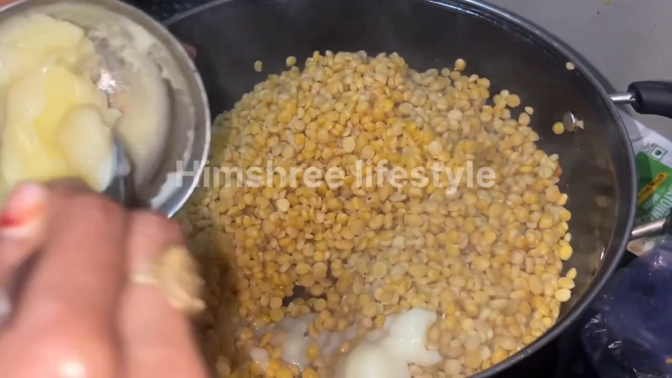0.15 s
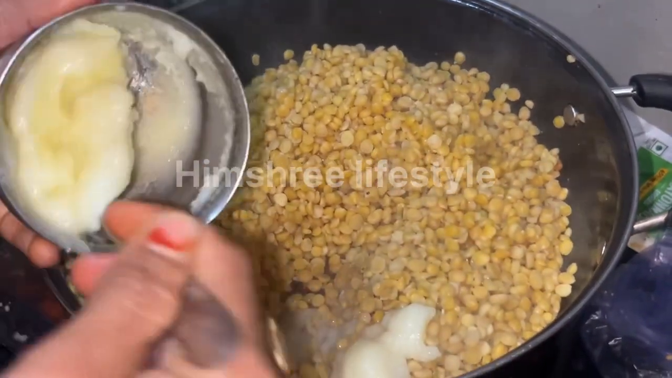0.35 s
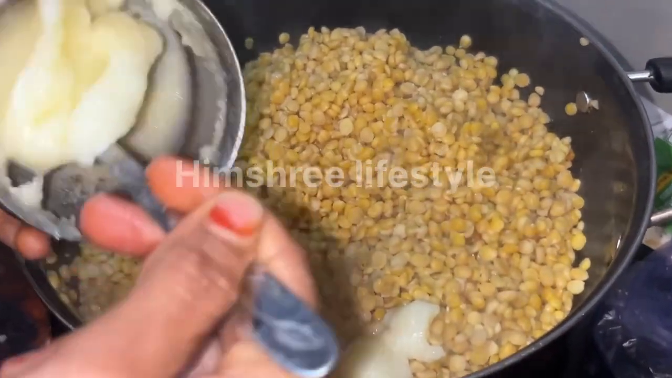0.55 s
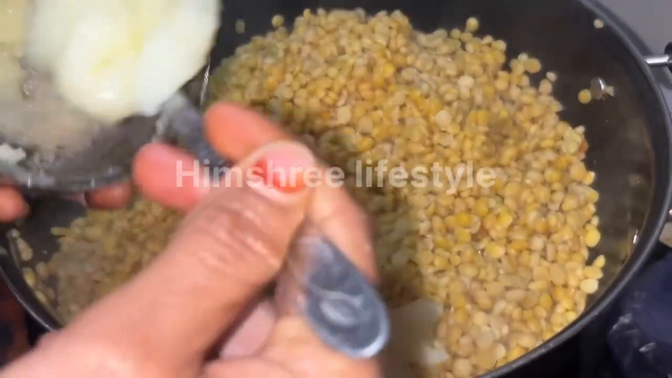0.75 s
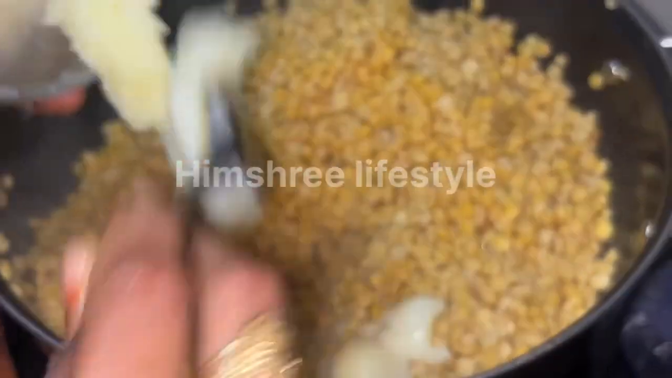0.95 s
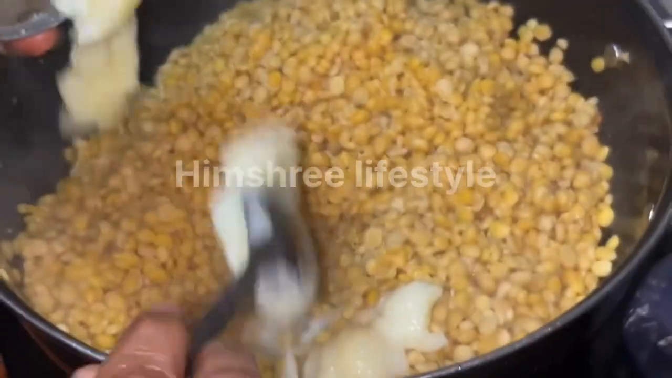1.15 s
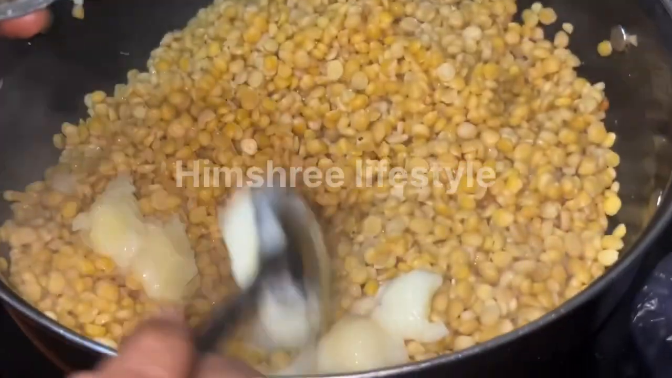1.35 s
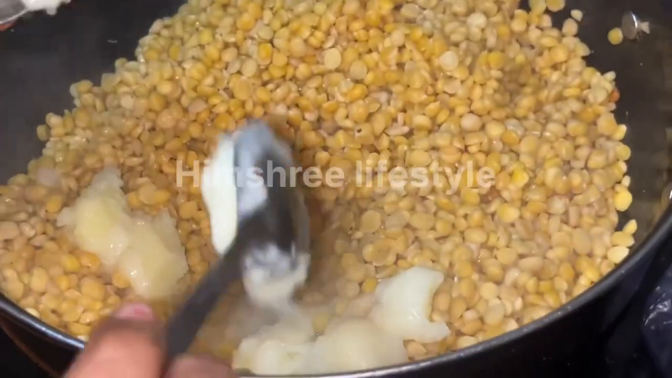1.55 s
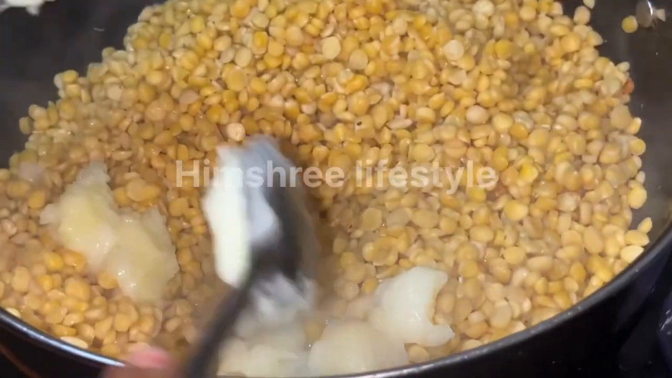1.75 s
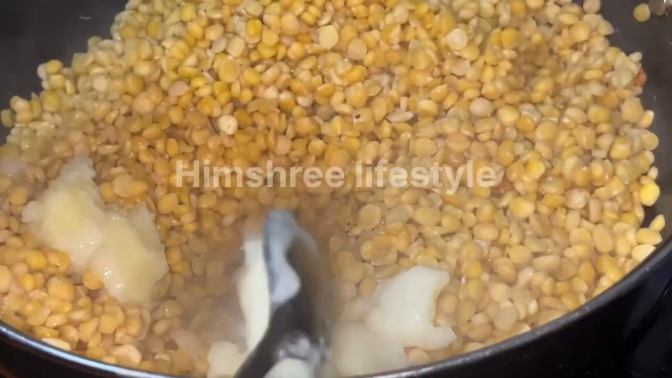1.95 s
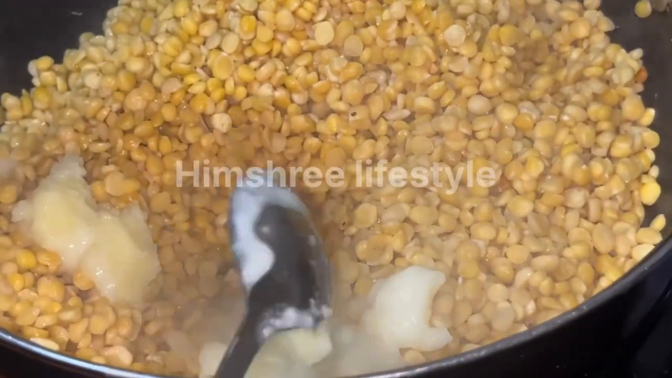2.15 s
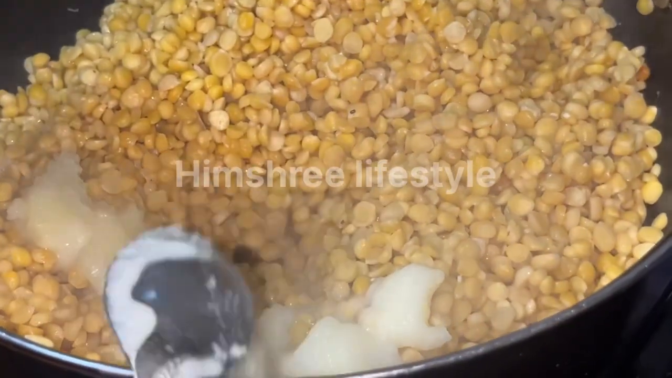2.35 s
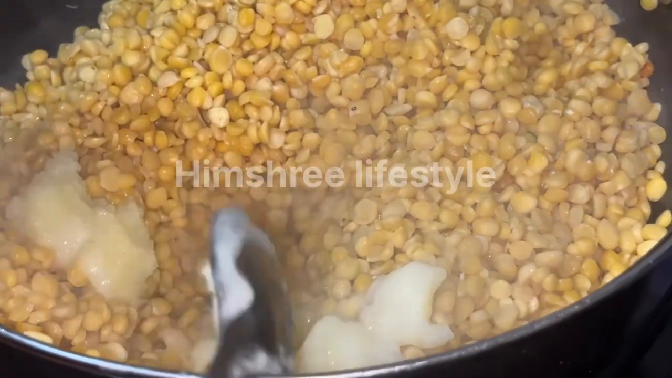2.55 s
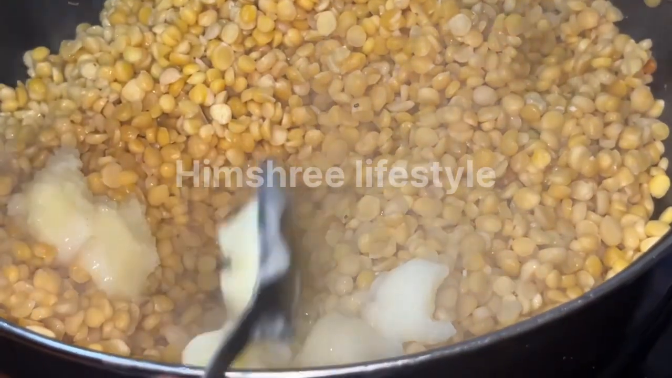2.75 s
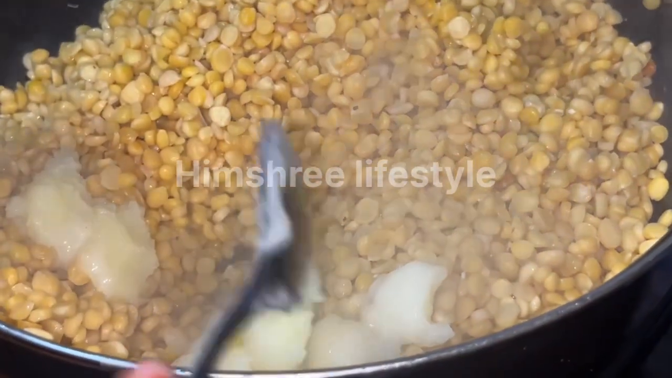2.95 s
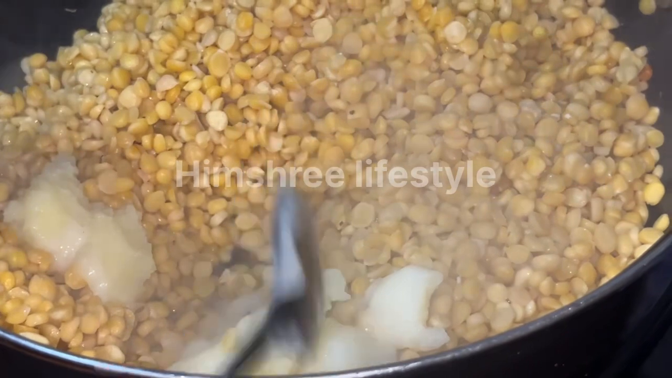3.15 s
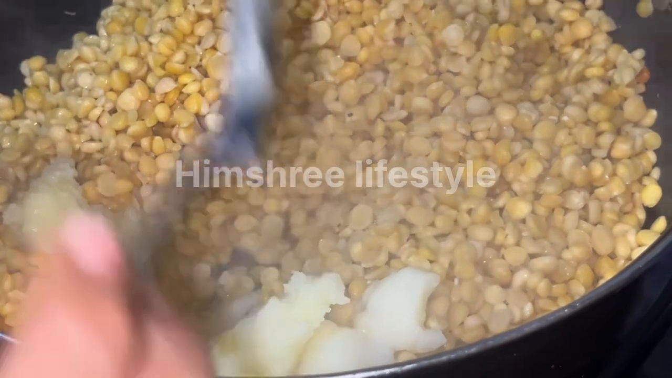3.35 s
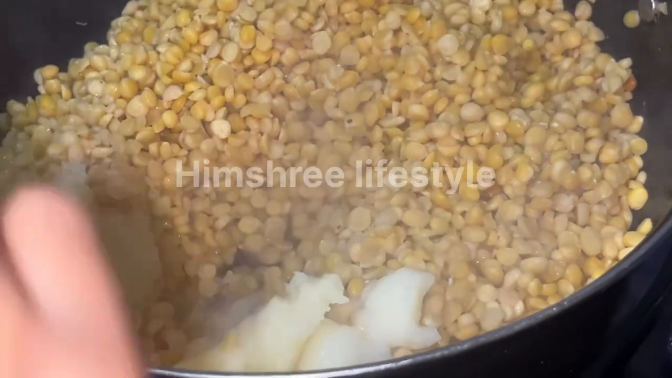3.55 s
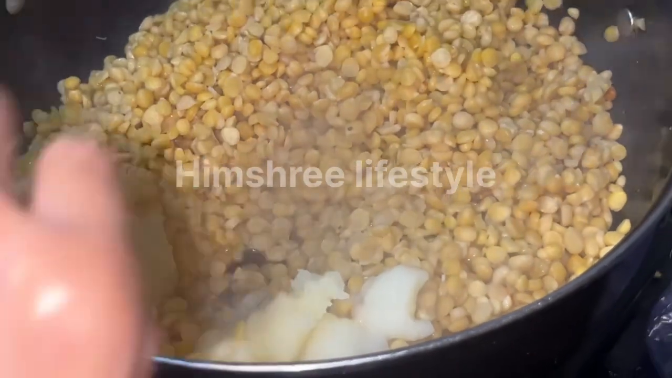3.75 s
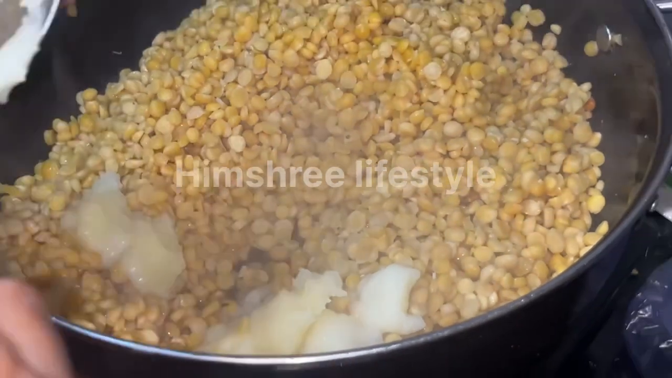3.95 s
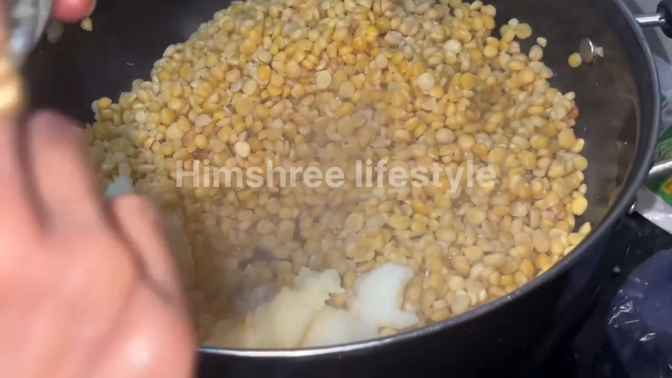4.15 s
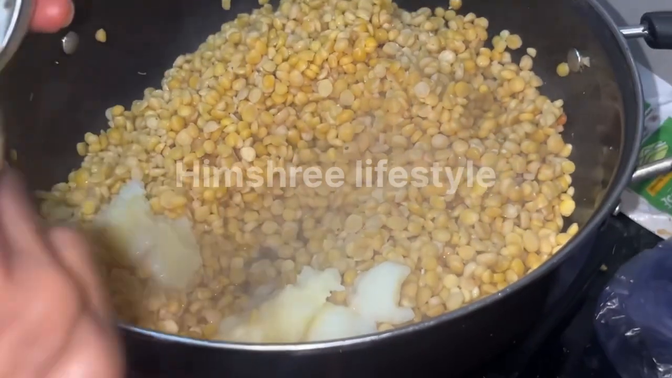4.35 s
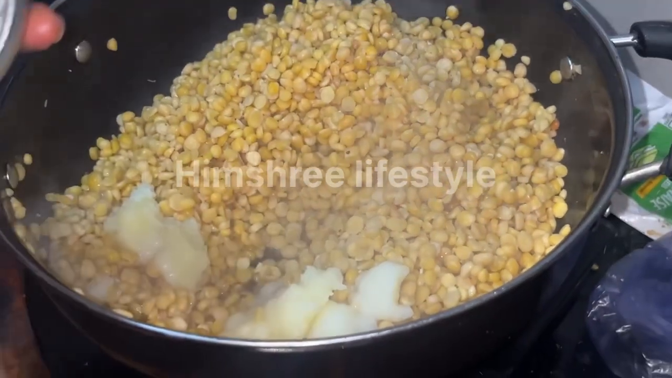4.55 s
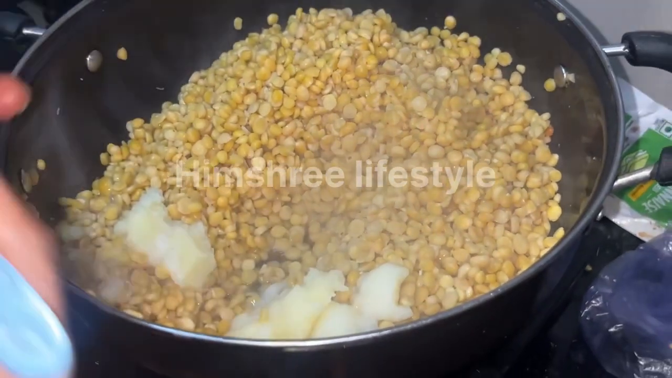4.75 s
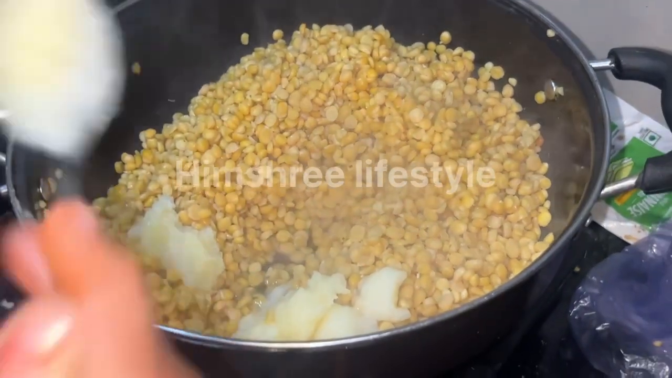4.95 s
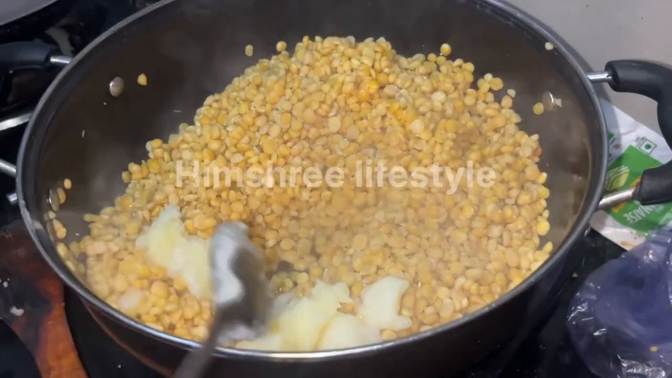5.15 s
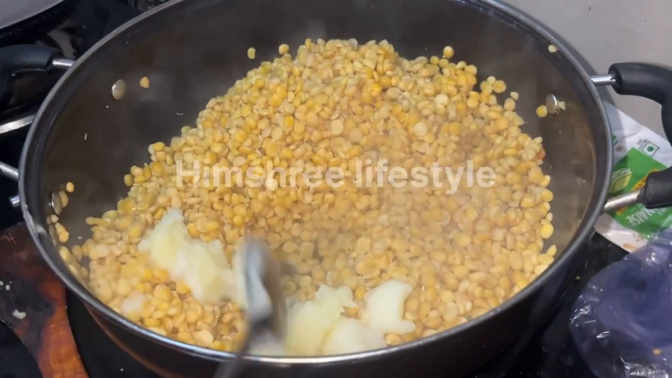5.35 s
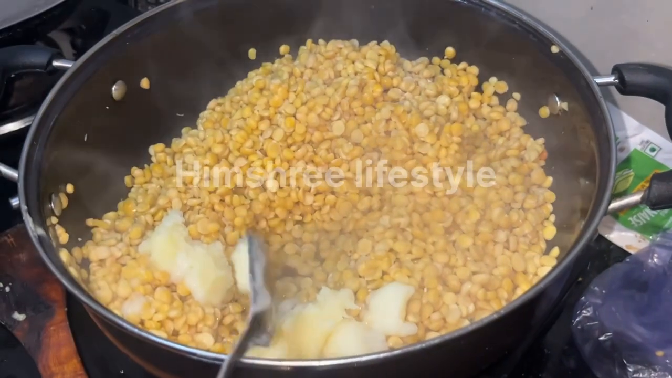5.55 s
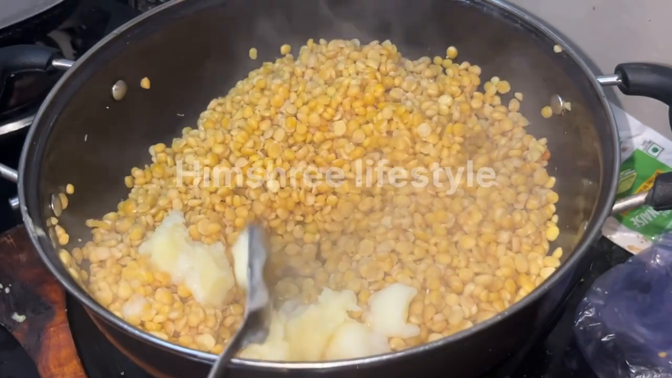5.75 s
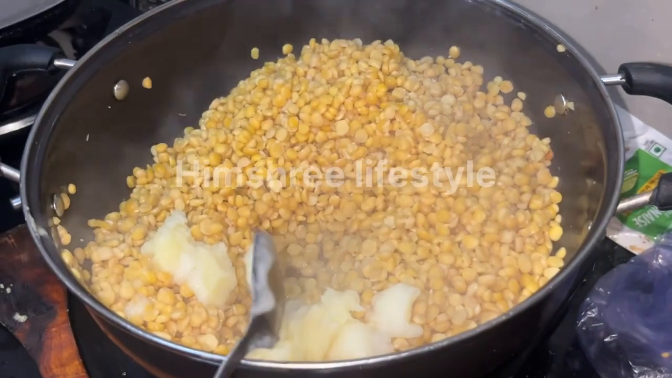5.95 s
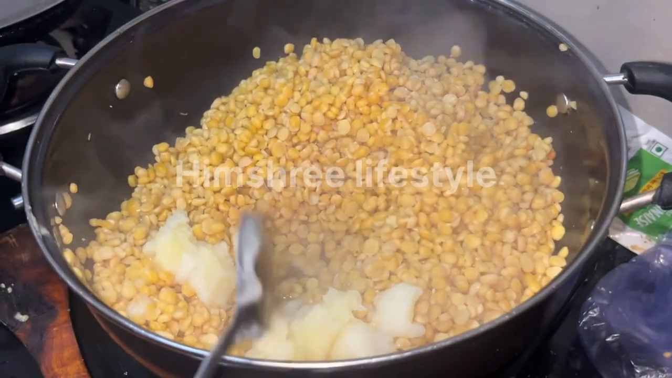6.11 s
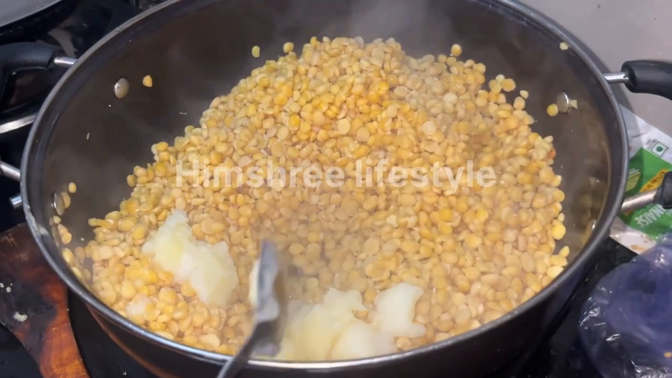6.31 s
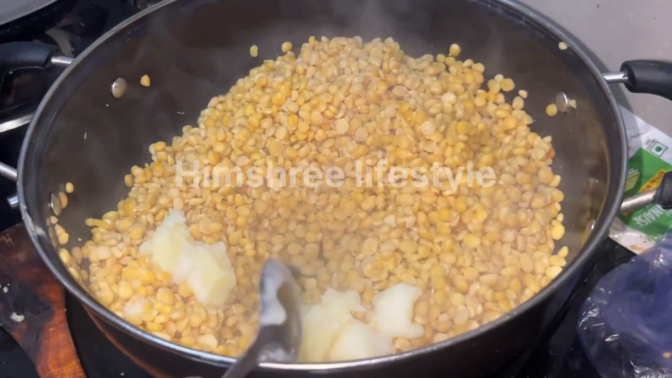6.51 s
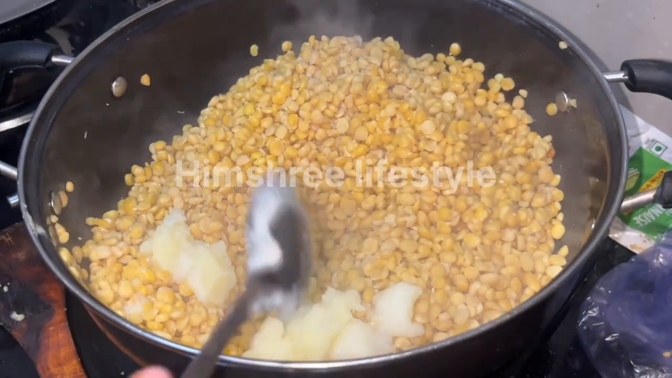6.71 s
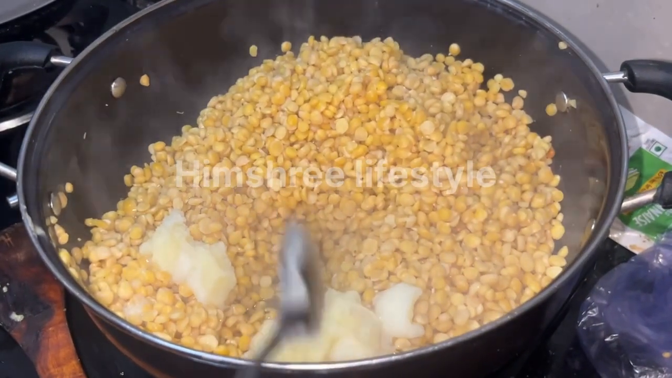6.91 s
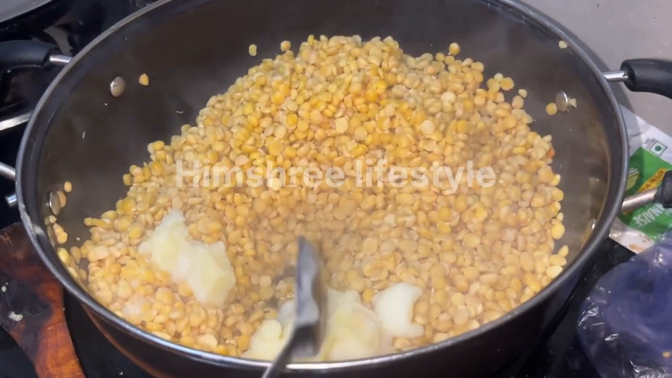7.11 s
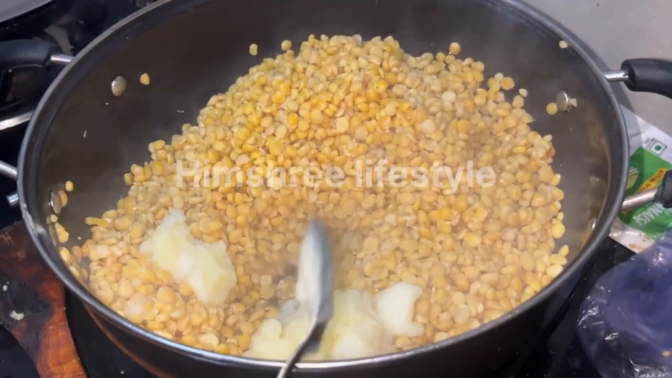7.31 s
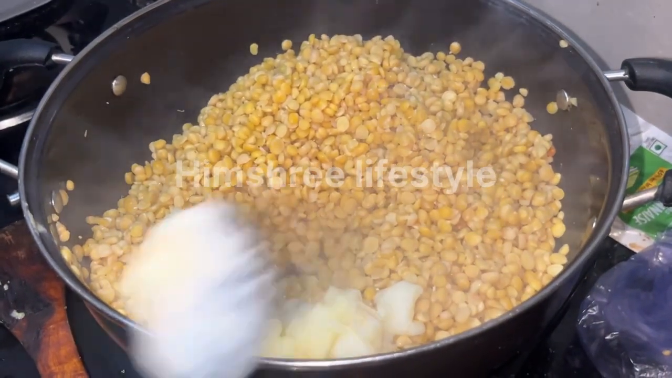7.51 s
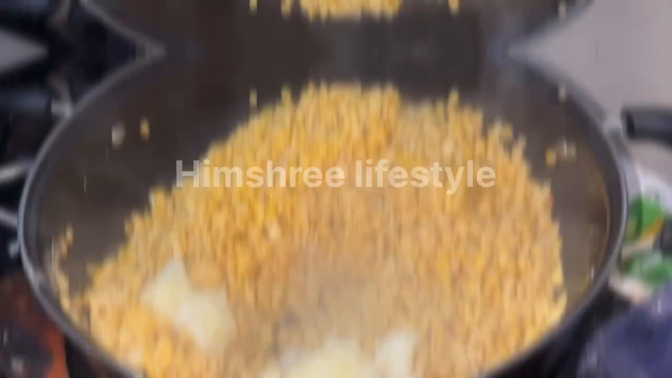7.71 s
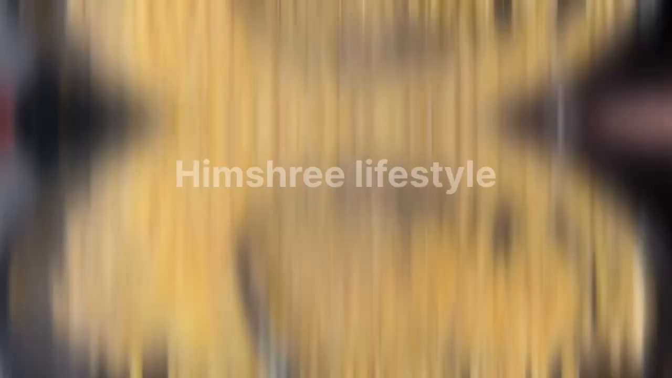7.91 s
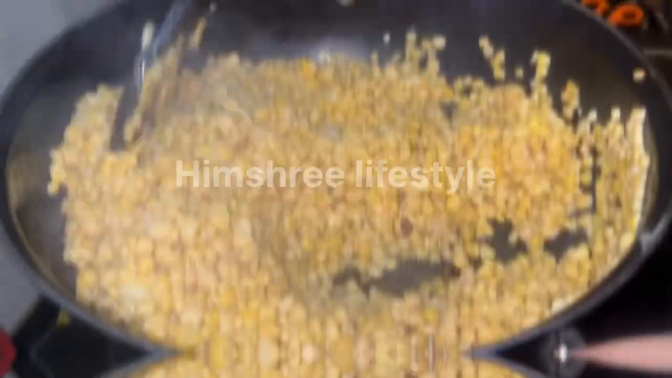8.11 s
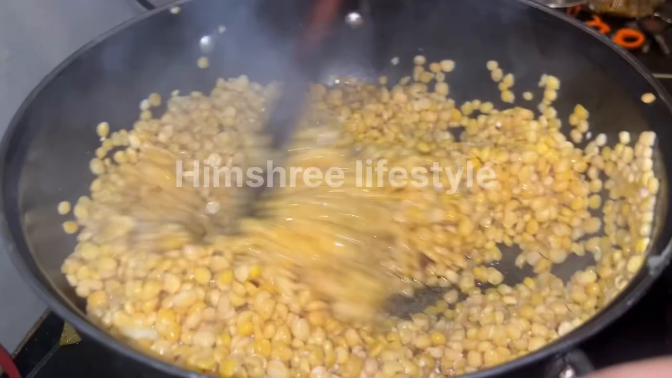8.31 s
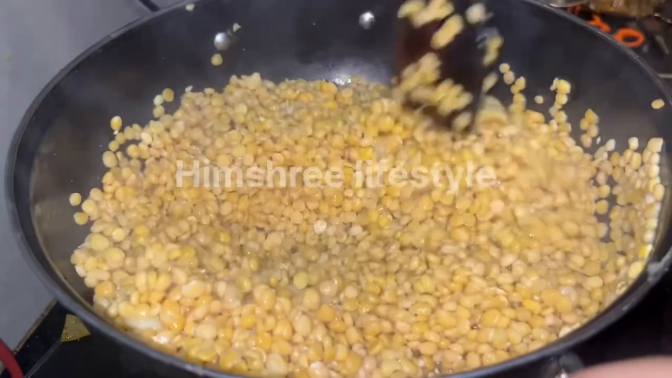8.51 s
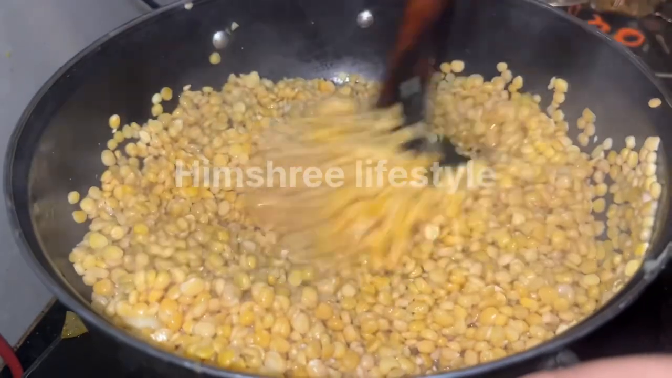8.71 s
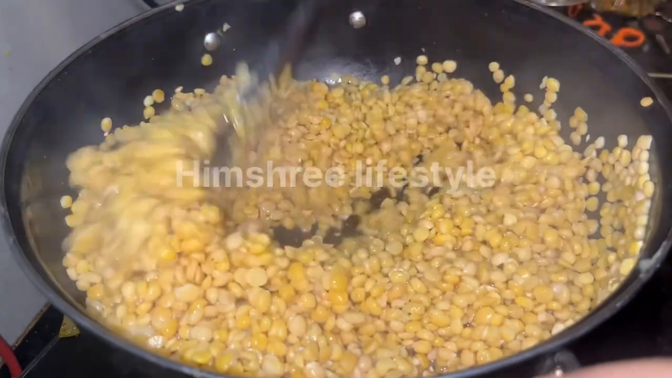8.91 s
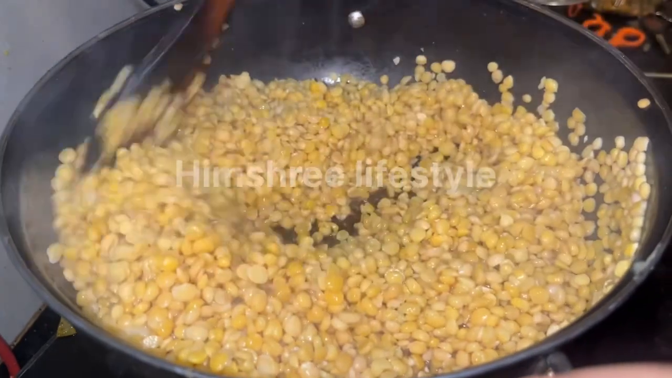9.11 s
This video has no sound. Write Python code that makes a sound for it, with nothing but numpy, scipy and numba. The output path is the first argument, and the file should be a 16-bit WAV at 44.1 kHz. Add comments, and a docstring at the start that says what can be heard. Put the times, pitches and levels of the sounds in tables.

```python
"""A steel spoon is knocked on the wall of a hot pan of lentils to shake off ghee: decaying modes and noise
bursts. A steady sizzle lies behind it, random steam pops over coloured noise. After a short silence the scene
changes: a wooden spatula thuds as damped modes and drags as stick-slip grains through resonances. Two close
microphone ports hear it all with a phase difference; rising steam rumbles on them as low noise."""
import sys
import numpy as np
from scipy import signal
from scipy.fft import rfft, irfft, next_fast_len
from scipy.io import wavfile
from numba import njit

SR = 44100
rng = np.random.default_rng(int(sys.argv[2]) if len(sys.argv) > 2 else 0)


def boost_factor(decibels):
    """Convert a level in decibels to a linear amplitude factor."""
    exponent = np.asarray(decibels, float) / 20
    return 10 ** exponent


def output_pcm(signal):
    """Save a mono or channel-first signal as 16-bit PCM at the path in sys.argv[1].

    Samples are clipped to [-1, 1] before scaling.
    """
    pcm = np.clip(np.atleast_2d(signal).T, -1, 1) * 32767
    wavfile.write(sys.argv[1], SR, np.round(pcm).astype(np.int16))


N = 408842

# spoon blows on the pan wall: t/s, level/dB, then lift/dB of the modes near 750, 1350 and 2100 Hz
SPOON_BLOWS = [(1.817, -8, -14.5, -11, -8.5), (1.9665, -6.5, -16.5, -18, -7),
               (2.1065, -9, -10.5, -13, -8.5), (2.5048, -4, -13.5, 4.5, -11),
               (2.6787, -6, -14.5, -13, -7.5), (3.012, -7.5, -14.5, -20, -5),
               (3.1784, -5.5, -16.5, -15, -4), (3.654, -19.5, -24, -2, -16), (5.082, -9.5, 4, 8.5, -9.5),
               (5.2003, -8, 0, 4, -5.5), (5.3829, -17, 1, 11.5, -11.5), (5.5416, -9.5, -12, -18, -3.5),
               (5.7058, -9, -12.5, -29, -2.5), (5.8682, -11, -12.5, -15, -5), (6.1676, -5, -8.5, -19, -2),
               (6.763, -4, -8.5, -2, -5.5), (6.9225, -4.5, -9.5, -8, -3.5), (7.0736, -5.5, -6.5, -4, -2.5),
               (7.2159, -12.5, -5, 5.5, -3), (7.862, -4, -35, 3.5, -39)]
# spatula strokes: t/s, hold/s, judder level/dB, pan floor resonance f/Hz, grit level/dB
DRAG_STROKES = [(8.122, .01, -46, 300, -58), (8.232, 0.13, -49.5, 300, -43.5),
                (8.679, .06, -29, 285, -33.5), (9.244, .01, -39.5, 360, -42)]
# the silence between spoon and spatula: start t/s, end t/s
SILENCE_SPAN = (7.869, 7.919)


def rms_one(x):
    """Normalisation: divide by the root mean square so that the mean power is one."""
    return x / np.sqrt(np.mean(x ** 2) + 1e-20)


def in_time(rows, silent=None):
    """Linear interpolation turns columns into signals; a given silent level holds outside the first one."""
    s, *columns = np.transpose(rows)
    t = np.arange(N) / SR
    signals = []
    for k, column in enumerate(columns):
        outside = silent if k == 0 else None
        signals.append(np.interp(t, s, column, left=outside, right=outside))
    return signals


def at_hz(points, hz):
    """Interpolation on a log-frequency axis, which spaces equal pitch ratios equally."""
    table_hz, values = np.transpose(points)
    return np.interp(np.log(hz + 1), np.log(table_hz), values)


def colour(x, spectrum):
    """Linear filtering: multiply the Fourier spectrum by a gain curve, then set the rms to one."""
    size = next_fast_len(N)
    hz = np.arange(size // 2 + 1) * SR / size
    shaped = rfft(x, size) * boost_factor(at_hz(spectrum, hz))
    return rms_one(irfft(shaped, size)[..., :N])


def band(x, low_hz, high_hz):
    """Band-pass filtering with a maximally flat Butterworth response."""
    sos = signal.butter(2, [low_hz, min(high_hz, .45 * SR)], "band", fs=SR, output="sos")
    return signal.sosfilt(sos, x)


def drift(rate):
    """Slow random modulation: unit-variance Gaussian points, rate per second, joined by lines."""
    steps = rng.standard_normal(int(N / SR * 400))[:int(N / SR * rate) + 2]
    return np.interp(np.arange(N) * rate / SR, np.arange(len(steps)), steps)


def grains(per_s, spread_db):
    """Bernoulli impulse process whose exponential dB sizes make a few clicks much larger than the rest."""
    sizes_db = spread_db * np.minimum(rng.exponential(1, N), 4.5)
    clicks = boost_factor(sizes_db) * rng.choice([-1, 1], N)
    return clicks * (rng.random(N) < per_s / SR)


def ring(clicks, hz, t60):
    """Damped harmonic oscillator: a two-pole filter that decays by 60 dB in t60 seconds."""
    r, w = boost_factor(-60 / (t60 * SR)), 2 * np.pi * hz / SR
    return signal.lfilter([0, np.sin(w)], [1, -2 * r * np.cos(w), r * r], clicks + 1e-18)


@njit
def moving_resonance(x, hz, r, sr):
    """Time-varying resonance: the pole angle follows the centre frequency, the radius sets the damping."""
    y = np.zeros(len(x))
    for i in range(2, len(x)):
        drive = (1 - r * r) * (x[i] - x[i - 2])
        feedback = 2 * r * np.cos(2 * np.pi * hz[i] / sr) * y[i - 1] - r * r * y[i - 2]
        y[i] = drive + feedback
    return y


def strike(times, levels_db, modes, contact_s, scatter_db):
    """Modal superposition: each blow swells over the contact and scatters mode strength, phase and pitch."""
    hz, level_db, t60 = np.transpose(modes)[:, :, None]
    t, out = np.arange(int(.2 * SR)) / SR, np.zeros(N + SR)
    onset = 1 - np.exp(-(t / contact_s) ** 2)
    chance = rng.standard_normal((len(times), 3, len(modes), 1))
    for s, blow_db, (size, phase, detune) in zip(times, levels_db, chance):
        decay = boost_factor(blow_db[:, None] + level_db + scatter_db * size - 60 * t / t60)
        rings = decay * np.sin(2 * np.pi * hz * (1 + 0.015 * detune) * t + 1.09 * phase)
        start = int((s - contact_s) * SR)
        out[start:start + len(t)] += rings.sum(axis=0) * onset
    return out[:N]


def burst(s, level_db, low_hz, high_hz, t60):
    """Broadband impact: a band of decaying noise for a contact too brief to ring."""
    t, out = np.arange(int(.1 * SR)) / SR, np.zeros(N + SR)
    envelope = boost_factor(-60 * t / t60) * np.minimum(t / (0.019 * t60), 1)
    puff = band(rng.standard_normal(len(t)) * envelope, low_hz, high_hz)
    start = int(s * SR)
    out[start:start + len(t)] = boost_factor(level_db) * puff / np.max(np.abs(puff))
    return out[:N]


def swells(times, holds, levels_db, rise, fall):
    """Exponential envelopes, straight in dB (rise and fall in dB/s): the largest gain and its event."""
    t = np.arange(0, N + 32, 32) / SR
    s, hold, db = (np.reshape(v, (-1, 1)) for v in (times, holds, levels_db))
    shapes = db - rise * np.maximum(s - t, 0) - fall * np.maximum(t - s - hold, 0)
    gain = np.interp(np.arange(N) / SR, t, boost_factor(shapes.max(axis=0)))
    loudest = np.repeat(shapes.argmax(axis=0), 32)[:N]
    return gain, loudest


def kitchen(x):
    """Diffuse reverberation: convolution with two independent noise tails that die band by band."""
    # reverberation of the kitchen: f/Hz, t60/s
    tail_t60 = [(300, 0.36), (1400, 0.3), (4000, 0.18), (10000, 0.051)]
    t, edges = np.arange(int(.5 * SR)) / SR, np.geomspace(150, 16000, 9)
    tails = 0
    for lo, hi in zip(edges, edges[1:]):
        decay = boost_factor(-60 * t / at_hz(tail_t60, np.sqrt(lo * hi)))
        tails = tails + band(rng.standard_normal((2, len(t))), lo, hi) * decay
    return signal.fftconvolve(x[None], tails * (t > .003), axes=1)[:, :N]


def ports(shared, apart, lead, alike):
    """Interaural-style coherence: shared sound has a phase gap, unshared sound adds with opposite signs."""
    # the two ports: f/Hz, left-right level/dB, right lead/rad, likeness 0-1,
    # then lead/rad and likeness 0-1 once the spatula is in
    port_table = [(0, 0, 0, .99, 0, .97), (400, -2, .3, .93, .2, .85), (700, -5.5, -.3, .65, -.8, .7),
                  (1200, -1.5, -.3, .6, -1.5, .4), (1550, -4, 0, .15, -1, .15), (2100, -1, 0, .98, 0, .85),
                  (3000, 0, 0, .995, -1.6, .62), (4200, 0, 0, .995, -.8, .42), (4900, 0, 0, .995, .8, .05),
                  (5600, 0, .8, .78, 1.6, .5), (6500, 0, 1, .75, 1.1, .58), (7600, 0, 2.6, .78, 2.9, .8),
                  (8000, 0, 3.05, .99, 3.14, .995), (8750, 0, 3.2, .995, 3.2, .995),
                  (9300, 0, 3.75, .8, 3.75, .7), (10600, 0, 5.3, .73, 5.3, .73),
                  (11150, 0, 6.25, .995, 6.25, .995), (12900, 0, 6.35, .995, 6.3, .995),
                  (13700, 0, 7.4, .5, 6.9, .4), (14500, 0, 9.35, .99, 9.35, .99),
                  (16500, 0, 9.42, .995, 9.42, .995)]
    size, table = next_fast_len(N), np.array(port_table)
    hz = np.arange(size // 2 + 1) * SR / size
    balance_db, gap, like = (np.interp(hz, table[:, 0], table[:, k]) for k in (1, lead, alike))
    like, side = np.clip(like, 0, 1), np.array([[1], [-1]])
    common = np.sqrt((1 + like) / 2) * rfft(shared, size)
    opposed = side * np.sqrt((1 - like) / 2) * rfft(apart, size)
    turned = (common + opposed) * boost_factor(side * balance_db / 2) * np.exp(-.5j * side * gap)
    return irfft(turned, size)[:, :N]


def low_noise():
    """Turbulent pressure noise: burner flutter, and lumpy rumble from steam or a shaken stove."""
    # one gust of steam over the ports: t/s, level/dB
    steam = [(5.6, -46), (5.67, -52), (5.78, -51), (5.85, -32), (5.95, -36.5), (6.17, -33.5), (6.28, -29),
             (6.4, -38.5), (6.73, -49)]
    # rumble spectrum per Hz: f/Hz, level/dB
    rumble_spectrum = [(15, -45), (25, -24), (54, -3), (108, -3.5), (140, 3.5), (173, -4), (233, -7.5),
                       (420, -22.5), (550, -17.5), (920, -27), (1500, -25), (2600, -120)]
    # burner flutter spectrum per Hz: f/Hz, level/dB
    flame_spectrum = [(15, -37), (25, -46), (38, -3), (54, -3.5), (70, -2), (128, 2), (152, -12), (172, -3),
                      (183, -17), (260, -22), (340, -11.5), (570, -120)]
    # burner flutter in time: t/s, level/dB
    flame_course = [(0.0, -53), (0.89, -59.5), (1.36, -53), (3.2, -52), (3.98, -56.5), (4.68, -52),
                    (4.9, -60), (5.6, -56), (7.0, -43), (7.82, -59.5), (8.15, -48), (9.27, -51)]
    knocks, strokes = np.transpose(SPOON_BLOWS), np.transpose(DRAG_STROKES)
    # knocks shake the stove 18 ms late
    knock_shake, _ = swells(knocks[0] + 0.018, 0, knocks[1] - 34, rise=740, fall=167)
    stroke_shake, _ = swells(strokes[0], strokes[1], strokes[2] - 7.5, rise=160, fall=167)
    gust = boost_factor(in_time(steam, -120)[0])
    rumble_gain = (gust + knock_shake + stroke_shake) * boost_factor(2.9 * drift(25))
    flame_gain = boost_factor(in_time(flame_course)[0] + 1.8 * drift(7))
    flame = flame_gain * colour(rng.standard_normal((2, N)), flame_spectrum)
    return flame + rumble_gain * colour(rng.standard_normal((2, N)), rumble_spectrum)


def pan_colour(x):
    """Resonant coloration: parallel band-passes of the pan add to the sizzle here and there."""
    # f/Hz, width/Hz, relative level/dB
    fry_peaks = [(1846, 47, 14), (2813, 34, 11), (3493, 70, 9), (4700, 100, -6), (5200, 53, 13.5),
                 (6000, 160, -20)]
    lifts = (boost_factor(db - 11.5) * band(x, hz - width / 2, hz + width / 2) for hz, width, db in fry_peaks)
    return x + sum(lifts)


def sizzle():
    """Shot noise: tiny steam pops, by pitch region, over blurred hiss; the second row is unrelated noise."""
    # vigour of the frying: t/s, level/dB, treble lift/dB
    vigour = [(0.0, -42.5, 5), (0.31, -43.5, 3), (0.9, -40.5, 2), (1.26, -38.5, 2.5), (2.5, -37, -1),
              (2.86, -38, 0.5), (3.12, -39, 1), (4.5, -38.5, 2.5), (4.96, -38.5, 1.5), (5.21, -37.5, 2.5),
              (6.17, -38.5, -0.5), (6.4, -37.5, 1.5), (7.75, -38, -1), (7.93, -32, 3.5), (8.08, -33, -1.5),
              (8.78, -32, 1), (9.01, -31.5, 4), (9.27, -32, 1.5)]
    # frying spectrum per Hz: f/Hz, level/dB
    fry_spectrum = [(150, -37), (300, -17.5), (600, -8), (1100, -12), (1500, -4), (2000, -4), (3300, 0),
                    (4500, -1.5), (5500, 0), (7500, 2), (10000, 0), (12500, -4), (14500, -7),
                    (15700, -15.5)]
    body_db, lift_db = in_time(vigour)
    edges = np.geomspace(1300, 17000, 7)
    pops = 0
    for lo, hi in zip(edges, edges[1:]):
        region = band(grains(700, 6.0) * boost_factor(0.5 * drift(38)), lo, 1.62 * hi)
        pops = pops + rms_one(region) * np.sqrt(hi)
    snaps = rms_one(grains(400, 3.8))
    direct = rng.standard_normal(N) + 0.58 * rms_one(pops) + 0.27 * snaps
    both = pan_colour(colour(np.array([direct, rng.standard_normal(N)]), fry_spectrum))
    both = both * boost_factor(.6 * drift(5))
    treble = signal.sosfilt(signal.butter(2, 8000, "high", fs=SR, output="sos"), both)
    return boost_factor(body_db) * (both + (boost_factor(lift_db) - 1) * treble)


def groans():
    """Frequency modulation: wavering near-tones from the phase integral of a drifting frequency."""
    # the pan floor hums under the blade: t/s, hold/s, level/dB, f/Hz
    hums = [(7.948, 0.039, -49.5, 326), (8.417, 0.107, -50.5, 368)]
    s, hold, level_db, tone_hz = np.transpose(hums)
    gain, groan = swells(s, hold, level_db, rise=800, fall=700)
    wavering = boost_factor(2.1 * drift(30))
    hz = tone_hz[groan] * (1 + 0.0187 * drift(34))
    return gain * wavering * np.sin(2 * np.pi * np.cumsum(hz) / SR)


def rubs():
    """Stick-slip friction: grains pass twice through the resonance of the spoon bowl against the wall."""
    # spoon rubbing the wall: t/s, hold/s, level/dB, bowl resonance f/Hz
    wall_rubs = [(0.003, 0.13, -62.5, 460), (1.44, 0.166, -59.5, 523), (2.278, 0.038, -45.5, 1320),
                 (2.37, 0.033, -43, 1330), (4.487, 0.016, -47, 1090), (5.218, 0.0027, -26, 1150),
                 (5.262, 0.0037, -31.5, 680), (5.396, .02, -53, 1050), (6.558, .04, -38, 1410),
                 (6.628, .025, -37, 696), (6.895, .022, -32, 1130)]
    slips = grains(1200, 3) * boost_factor(2.5 * drift(45))
    r = np.exp(-np.pi * 280 / SR)  # 280 Hz bandwidth per pass
    s, hold, level_db, bowl_hz = np.transpose(wall_rubs)
    gain, rub = swells(s, hold, level_db, rise=600, fall=650)
    hz = bowl_hz[rub]
    once = moving_resonance(slips, hz, r, SR)
    return gain * rms_one(moving_resonance(once, hz, r, SR))


def spatula():
    """Damped impact and stick-slip: dull wooden thuds, then judder rings the pan floor as lentils grate."""
    # spatula on the pan floor: t/s, level/dB
    floor_thuds = [(8.136, -21), (8.604, -17), (8.985, -41.5), (9.111, -20)]
    # modes of the thud: f/Hz, level/dB, t60/s
    wood_modes = [(251, -13, 0.076), (299, -2, 0.046), (593, 0.5, 0.026), (770, -14, 0.033),
                  (1060, -10, 0.041), (1300, -10.5, 0.029)]
    s, peak = np.transpose(floor_thuds)
    blows_db = peak[:, None] + 2.9 + np.zeros(len(wood_modes))
    thuds = strike(s, blows_db, wood_modes, contact_s=.002, scatter_db=1.)

    start, hold, judder_db, floor_hz, grit_db = np.transpose(DRAG_STROKES)
    drag, stroke = swells(start, hold, judder_db, rise=259, fall=400)
    grate, _ = swells(start, hold, grit_db, rise=259, fall=400)
    # each thud sets the blade juddering briefly
    jolt, _ = swells(s, 0, peak - 12, rise=3000, fall=700)
    hz = np.where(jolt > drag, 332, floor_hz[stroke])
    slips, lentils = grains(830, 4.1), grains(3000, 4.9)
    floor_ring = moving_resonance(slips, hz, np.exp(-np.pi * 60 / SR), SR)  # 60 Hz bandwidth
    judder = rms_one(floor_ring) + 0.1 * rms_one(band(slips, 160, 870))

    grit = rms_one(band(lentils, 720, 3200))
    floor_modes = 0.63 * rms_one(ring(lentils, 1187, 0.055)) + 0.1 * rms_one(ring(lentils, 2200, 0.018))
    steady = boost_factor(-48) * floor_modes
    stirring = np.arange(N) > SILENCE_SPAN[1] * SR
    return thuds + (drag + jolt) * judder + ((grate + boost_factor(-58)) * grit + steady) * stirring


def spoon():
    """Modal excitation: the landing point shares out the lower modes; crack, clatter and rattle join in."""
    # centres of the bands that share a blow: f/Hz
    share_hz = [430, 750, 1350, 2100, 4500]
    # modes of the loaded pan wall: f/Hz, level/dB, t60/s
    wall_modes = [(136.3, -24, 0.3), (305, -15, 0.072), (402, -12.5, 0.049), (516, -4, 0.039),
                  (658, -8.5, 0.06), (737, -4.5, 0.034), (1186, -6, 0.015), (1320, -11, 0.022),
                  (1454, -16.5, 0.046), (1692, -10, 0.054), (1764, -6, 0.026), (1834, -1.5, 0.013),
                  (1910, -11, 0.012), (1975, 10.5, 0.0085), (2247, 6.5, 0.009), (2538, -4.5, 0.012),
                  (3030, -15, 0.021), (3830, -23, .02), (4310, -18, 0.02), (4556, -17.5, 0.04),
                  (4856, -11, 0.026), (5345, 2, 0.012), (5740, 2.5, 0.009), (6340, -7, 0.016),
                  (7250, -10, 0.021), (7810, -2.5, 0.011), (9780, -8.5, 0.019), (10600, -9, 0.011),
                  (11770, -7, 0.0078), (13500, -25, 0.005)]
    # light dry ticks of the spoon, with one soft scrape at 7.846 s: t/s, level/dB, lowest f/Hz, highest f/Hz,
    # t60/s
    dry_ticks = [(0.8963, -16.5, 515, 9500, 0.01), (1.103, -41, 400, 2020, 0.023),
                 (1.1813, -28, 298, 3000, 0.019), (1.297, -41, 405, 644, 0.078),
                 (2.155, -22, 1200, 5000, .012), (2.636, -20, 1180, 5940, 0.014),
                 (3.347, -17.5, 400, 3970, 0.016), (3.5938, -16, 3000, 14100, 0.017),
                 (3.8583, -15.5, 503, 4260, 0.018), (4.548, -19.5, 3000, 14000, 0.018),
                 (4.601, -22, 500, 4560, 0.027), (4.7134, -25, 500, 7000, 0.053),
                 (5.255, -20.5, 700, 6030, 0.07), (6.628, -22.5, 600, 3200, .06),
                 (6.878, -14.5, 990, 1300, 0.034), (7.056, -18, 800, 5960, 0.013),
                 (7.846, -16.5, 2200, 3100, 0.1), (8.535, -19, 500, 3000, 0.0089)]
    s, peak, *lifts = np.transpose(SPOON_BLOWS)
    # the lowest modes are alike for every knock, at -12.5 dB; the highest have no lift
    shares = np.transpose([-12.5 + 0 * peak, *lifts, 0 * peak])
    log_mode_hz = np.log(np.array(wall_modes)[:, 0])
    levels = [p + np.interp(log_mode_hz, np.log(share_hz), v) for p, v in zip(peak, shares)]
    knocks = strike(s, np.array(levels) + 3.0, wall_modes, contact_s=.0018, scatter_db=2.0)
    cracks = sum(burst(at, p - 7, 1670, 13400, 0.025) for at, p in zip(s, peak))
    clatter = sum(burst(at + 0.0019, p + m - 10.1, 1090, 2170, 0.034)
                  for at, p, m in zip(s, peak, lifts[2]))
    rattle = sum(burst(at + .003, p - 14, 4040, 6600, 0.042) for at, p in zip(s, peak))
    ticks = sum(burst(*row) for row in dry_ticks)
    return knocks + rattle + cracks + clatter + ticks


def scene():
    """Superposition: contacts, sizzle and rumble add at the ports; after a brief silence the scene changes from
    spoon to spatula."""
    # nearby surfaces answer each contact: delay t/s, level/dB
    reflections = [(.015, -18), (.030, -21)]
    contact = spoon() + spatula() + rubs() + groans()
    echoes = sum(boost_factor(db) * np.pad(contact, (int(s * SR), 0))[:N] for s, db in reflections)
    tails = boost_factor(-35.5) * kitchen(contact) + echoes * [[1], [.5]]
    shared, apart = sizzle() + low_noise() + tails
    # close contacts differ in phase: the unshared part takes them a quarter cycle shifted
    quadrature = signal.hilbert(contact, next_fast_len(N)).imag[:N]
    shared, apart = shared + contact, apart - .6 * quadrature
    t = np.arange(N) / SR
    before = np.clip((SILENCE_SPAN[0] - t) / 0.00038, 0, 1)  # fade-out in s
    after = np.clip((t - SILENCE_SPAN[1]) / 0.029, 0, 1)  # fade-in in s
    spoon_part = before * ports(shared, apart, lead=2, alike=3)
    return spoon_part + after * ports(shared, apart, lead=4, alike=5)


def roll_off(x):
    """The treble ends steeply here."""
    return signal.sosfilt(signal.butter(12, 16480, fs=SR, output="sos"), x)


def record(dry):
    """Saturation and low-pass filtering: a tanh curve rounds the peaks, a steep filter cuts the top."""
    rounded = .95 * np.tanh(dry / .95)
    mix = signal.sosfilt(signal.cheby2(10, 60, 16450, fs=SR, output="sos"), rounded)
    return roll_off(mix)


dry = scene()
out = record(dry)
output_pcm(out)
```